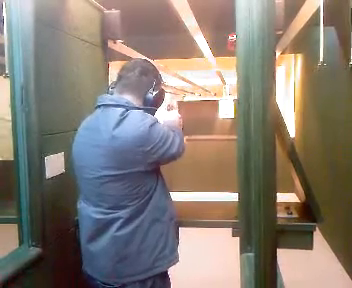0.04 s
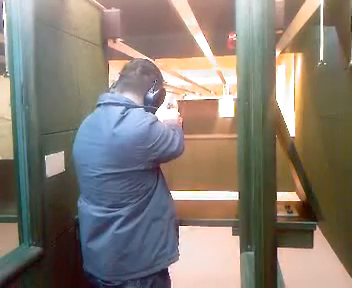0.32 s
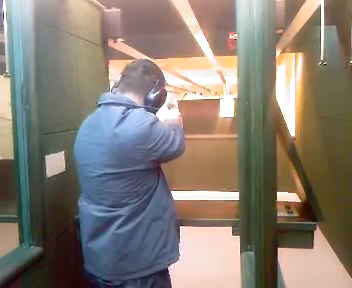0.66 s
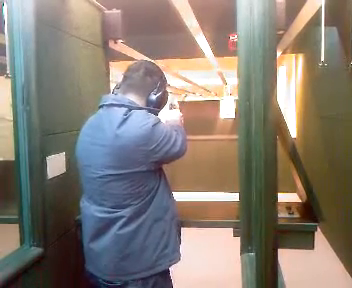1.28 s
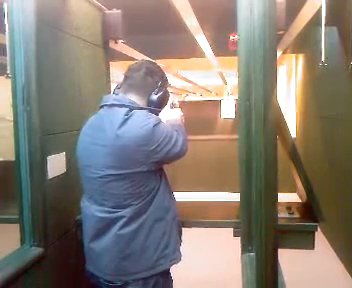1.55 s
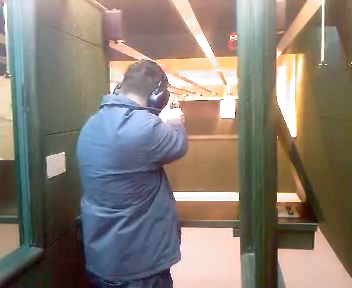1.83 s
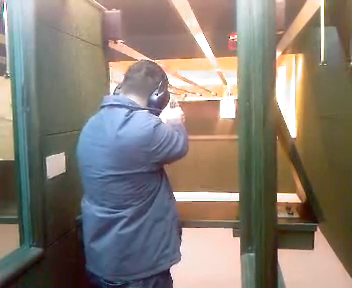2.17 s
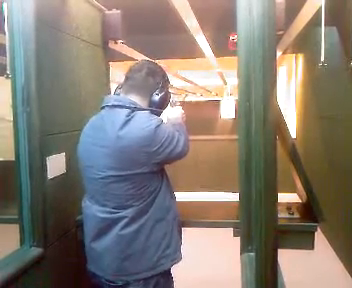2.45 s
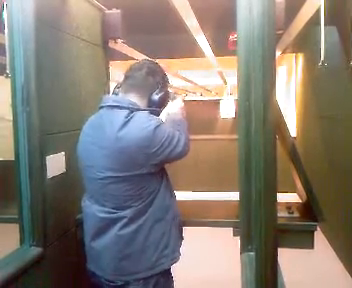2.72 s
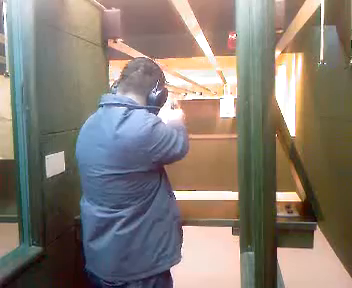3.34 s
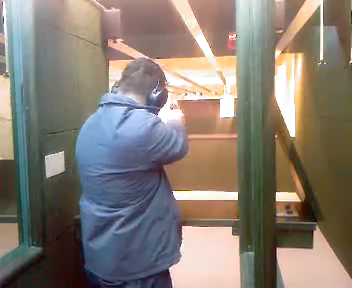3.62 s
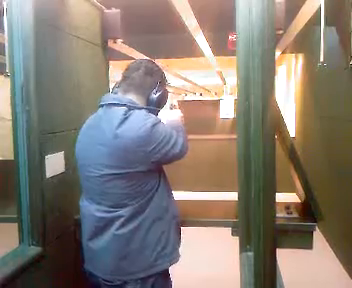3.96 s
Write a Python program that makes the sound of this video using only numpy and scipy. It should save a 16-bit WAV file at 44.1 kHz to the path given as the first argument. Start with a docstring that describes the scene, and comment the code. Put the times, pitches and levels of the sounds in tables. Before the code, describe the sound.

One pistol shot fades and another blasts out, echoing indoors over humming ventilation.

```python
"""Two pistol shots in an indoor range, heard from just behind the shooter.
The first blast is already dying away in the concrete hall, over ventilation that hums throughout.
Spent brass cases clink down from 0.4 s, and the gun's steel action clicks as it is handled from 1 s.
At 3 s the hammer falls and the second blast overloads a small narrow-band microphone into a flat roar.
As it decays, one more case lands."""
import sys
import numpy as np
from scipy import signal
from scipy.fft import rfft, irfft
from scipy.io import wavfile

SR = 44100
rng = np.random.default_rng(int(sys.argv[2]) if len(sys.argv) > 2 else 0)


def materialize(psi):
    """Save the field psi as 16-bit PCM at rate SR to the path in sys.argv[1].

    A 1-D psi becomes a single channel; in a 2-D psi each row is a channel.
    """
    bounded = np.clip(np.atleast_2d(psi).T, -1, 1)
    quanta = np.round(bounded * 32767).astype(np.int16)
    wavfile.write(sys.argv[1], SR, quanta)


N = 176400
TIME_S = np.arange(N) / SR
BIN_HZ = np.arange(N // 2 + 1) * SR / N


def undb(db):
    """Decibels to gain."""
    return 10 ** (np.asarray(db) / 20)


def along(table, hz):
    """Read a table on a log-frequency axis."""
    row_hz, values = np.array(table, float).T
    return np.interp(np.log(hz + 1), np.log(row_hz), values)


def noise(bin_gain):
    """Noise of rms 1 with the given spectrum."""
    shaped = irfft(rfft(rng.standard_normal(N)) * bin_gain, N)
    return shaped / shaped.std()


def coloured(spectrum, ripple_db=1.57, ripple_step_hz=30):
    """Noise of rms 1 shaped by a table, rippled by interference from nearby walls."""
    knots = rng.standard_normal(len(BIN_HZ))
    ripple = np.interp(BIN_HZ / ripple_step_hz, np.arange(len(knots)), knots)
    return noise(undb(along(spectrum, BIN_HZ) + ripple_db * ripple))


def fade(start_s, t60_s):
    """Sudden onset, then exponential decay."""
    age_s = TIME_S - start_s
    return (age_s >= 0) * np.exp(-np.log(1000) * np.maximum(age_s, 0) / t60_s)


def waver(spread_db, rate_hz):
    """A gain that wanders randomly about 0 dB."""
    return undb(spread_db * noise(np.exp(-(BIN_HZ / rate_hz) ** 2)))


def resonance(hz, half_width_hz):
    """Noise ringing in one narrow resonance."""
    return noise(1 / (1 + ((BIN_HZ - hz) / half_width_hz) ** 2))


def ringing(modes, start_s, t60_s):
    """Narrow resonances struck at once and left to fade."""
    return sum(undb(db) * resonance(hz, width) for hz, width, db in modes) * fade(start_s, t60_s)


def knock(spectrum, start_s, t60_s, room_db=-10.5, room_t60_s=0.19):
    """A short burst in a small body's colour, with a faint room tail."""
    room_tail = undb(room_db) * fade(start_s, room_t60_s)
    return coloured(spectrum) * np.hypot(fade(start_s, t60_s), room_tail)


# Near blast. Each row: frequency in Hz, relative density in dB.
BOOTH_SPECTRUM = [(60, -27.5), (200, -27), (380, 6), (700, 0.5), (1500, -5), (3000, -5.5), (5500, -6)]


def booth(start_s):
    """The near blast rings briefly within the booth."""
    return undb(1) * coloured(BOOTH_SPECTRUM) * fade(start_s, t60_s=0.43)


# The hall's answer to a blast. Each row: frequency in Hz, relative density in dB.
HALL_SPECTRUM = [(40, -38), (130, -29.5), (220, -24.5), (300, -22.5), (450, -6.5), (650, -4.5), (900, 3.5),
                 (1500, 0), (2000, -3), (2350, -9.5), (2800, -2.5), (3600, -9), (5000, -13.5),
                 (6000, -23.5)]
# Reverberation time. Each row: frequency in Hz, T60 in seconds.
HALL_DECAY = [(100, .8), (250, 0.53), (500, 0.6), (1000, 0.6), (2500, 0.64), (5500, 0.51)]


def hall(start_s):
    """Dense echoes of a blast; each octave dies at its own rate."""
    spectrum = rfft(coloured(HALL_SPECTRUM))
    bin_octave = np.log2(np.clip(BIN_HZ, 64, 8192))
    echoes = 0
    for octave in range(6, 14):
        band = irfft(spectrum * np.maximum(1 - abs(bin_octave - octave), 0), N)
        echoes += band * fade(start_s, along(HALL_DECAY, 2. ** octave))
    return echoes


# Late echoes. Each row: frequency in Hz, relative density in dB.
LANE_SPECTRUM = [(40, -29), (140, -12), (215, -2), (270, 2), (550, 7), (900, -1), (1300, -5), (2500, -18),
                 (5000, -33)]


def lane_tail(start_s):
    """A slow tail returns from the far end of the lanes."""
    return undb(-46.5) * coloured(LANE_SPECTRUM) * fade(start_s, t60_s=1.806)


# Resonances of the fittings. Each row: frequency in Hz, half-width in Hz, level in dB re the shot.
FITTING_MODES = [(227.2, 7.9, -52.5), (350, 13, -55.5), (562, 18, -53.5), (1160, 11, -50)]
# Pistol shots. Each row: start in seconds, level in dB before the microphone overloads.
SHOTS = [(-0.285, 25.5), (3.0151, 23.5)]


def blasts():
    """Each blast hits the booth, fills the hall and leaves fittings ringing."""
    out = 0
    for start_s, db in SHOTS:
        echoes = booth(start_s) + hall(start_s) + lane_tail(start_s)
        clumping = waver(spread_db=1.14, rate_hz=110)  # echoes arrive in clumps
        fittings = ringing(FITTING_MODES, start_s, t60_s=1.594)
        out += undb(db) * (echoes * clumping + fittings)
    return out


# Moving air. Each row: frequency in Hz, relative density in dB.
AIR_SPECTRUM = [(25, -13), (60, -9.5), (110, -9), (200, -7.5), (320, -5), (430, -6.5), (560, -4), (720, -1),
                (860, -5), (980, -13), (1250, -4), (1450, -10.5), (1750, -5), (2050, -6.5), (2350, -13.5),
                (2900, -9), (3400, -15.5), (4200, -21), (5200, -23), (6000, -29)]
# Duct resonances. Each row: frequency in Hz, half-width in Hz, level in dB.
DUCT_MODES = [(318, 30, -66.5), (1320, 35, -70), (1613, 63, -66.5)]
# Fan whine. Each row: time in seconds, level in dB.
WHINE_LEVELS = [(0, -62.5), (1.45, -60.5), (1.8, -56), (2.1, -57.5), (2.28, -57.5), (2.6, -53),
                (2.95, -63.5), (4, -56.5)]


def ventilation():
    """Steady air, wavering duct resonances and the fan's whine."""
    air = undb(-52) * coloured(AIR_SPECTRUM)
    ducts = 0
    for hz, half_width_hz, db in DUCT_MODES:
        ducts += undb(db) * waver(spread_db=3, rate_hz=5.5) * resonance(hz, half_width_hz)
    whine_db = np.interp(TIME_S, *np.array(WHINE_LEVELS).T)
    whine = undb(whine_db) * resonance(hz=808, half_width_hz=11)
    return air + ducts + whine


# Brass impact at pitch ratio 1. Each row: frequency in Hz, relative density in dB.
BRASS_SPECTRUM = [(500, -14), (2200, -15), (2850, 6), (3200, -2), (3700, -2), (4500, -2), (5000, -14),
                  (5350, -15), (5600, -8), (6200, -12)]
# Brass ring at pitch ratio 1. Each row: frequency in Hz, half-width in Hz, level in dB re the impact.
BRASS_MODES = [(2750, 87, -27), (4980, 58, -9.5), (5520, 77, -15)]
# Case impacts. Each row: start in seconds, level in dB, knock T60 in seconds, pitch ratio.
CASE_IMPACTS = [(0.3793, -40, .12, 1.04), (0.633, -49.5, .08, 0.64), (.667, -55, .1, 1.0),
                (1.526, -44.5, 0.11, .84), (1.7056, -45.5, 0.091, .99), (1.737, -56, .06, .93),
                (3.758, -36.5, 0.1, 1.01)]


def spent_cases():
    """Brass cases clink on floor and booth, each impact at its own pitch."""
    out = 0
    for start_s, db, t60_s, pitch in CASE_IMPACTS:
        spectrum = [(hz * pitch, level) for hz, level in BRASS_SPECTRUM]
        modes = [(hz * pitch, width, level) for hz, width, level in BRASS_MODES]
        out += undb(db) * (knock(spectrum, start_s, t60_s) + ringing(modes, start_s, t60_s=0.12))
    return out


# Steel impact. Each row: frequency in Hz, relative density in dB.
STEEL_SPECTRUM = [(300, -31), (800, 0.5), (1200, -2.5), (1700, 1.5), (2200, 3.5), (2800, -2), (3300, -3),
                  (3900, -4), (5000, -3.5), (6000, -3.5)]
# Steel ring. Each row: frequency in Hz, half-width in Hz, level in dB re the click.
STEEL_MODES = [(2020, 98, -19), (3200, 110, -18), (4920, 120, -17)]
# Clicks. Each row: start in seconds, level in dB, snap T60 in seconds, thud level in dB, thud in Hz.
ACTION_CLICKS = [(1.004, -28, 0.019, -42.5, 406), (1.0091, -29.5, 0.038, -42, 453),
                 (1.0258, -43, 0.063, -42.5, 403), (1.2845, -35.5, 0.026, -47, 770),
                 (1.2913, -43, .04, -46.5, 600), (1.523, -51, 0.055, -43.5, 620)]


def gun_action(thud_half_width_hz=56):
    """Steel parts tick on first contact, snap home and ring, with a dull thud from the grip."""
    out = 0
    for start_s, db, snap_t60_s, thud_db, thud_hz in ACTION_CLICKS:
        tick = undb(4.5) * coloured(STEEL_SPECTRUM) * fade(start_s, t60_s=0.0056)
        snap = knock(STEEL_SPECTRUM, start_s, snap_t60_s)
        ring = ringing(STEEL_MODES, start_s, t60_s=0.12)
        thud = ringing([(thud_hz, thud_half_width_hz, thud_db)], start_s, t60_s=0.13)
        out += undb(db) * (tick + snap + ring) + thud
    return out


def hammer(shot_s, lead_s=0.0088):
    """The steel hammer falls just ahead of the blast."""
    return undb(-34) * coloured(STEEL_SPECTRUM) * fade(shot_s - lead_s, t60_s=0.11)


def scene():
    """Everything at the shooter's booth, in mono."""
    hammers = sum(hammer(shot_s) for shot_s, _ in SHOTS)
    return (blasts() + ventilation() + spent_cases() + gun_action() + hammers)[None]


def record(dry):
    """The microphone saturates and keeps a narrow band; overshoots clip into crackle; the top is cut."""
    overload, knee, ceiling = 0.68, 23, 0.74
    mic_low_hz, mic_top_hz, mic_edge_hz, mic_stop_hz, top_cut_hz = 200, 5404, 220, 6300, 15900
    saturated = dry / (1 + abs(dry / overload) ** knee) ** (1 / knee)
    thin = signal.sosfilt(signal.butter(1, mic_low_hz, "high", fs=SR, output="sos"), saturated)
    hz = np.linspace(0, SR / 2, 513)
    passband = 1 / (1 + np.exp(np.minimum((hz - mic_top_hz) / mic_edge_hz, 50)))
    taps = signal.firwin2(255, hz, passband * (hz < mic_stop_hz), fs=SR, window="blackman")
    narrow = signal.fftconvolve(thin, taps[None], mode="same", axes=1)
    crackle_flicker = waver(spread_db=0.4, rate_hz=230)
    clipped = np.clip(narrow * crackle_flicker, -ceiling, ceiling)
    return signal.sosfilt(signal.ellip(8, .2, 70, top_cut_hz, fs=SR, output="sos"), clipped)


dry = scene()
out = record(dry)
materialize(out)
```